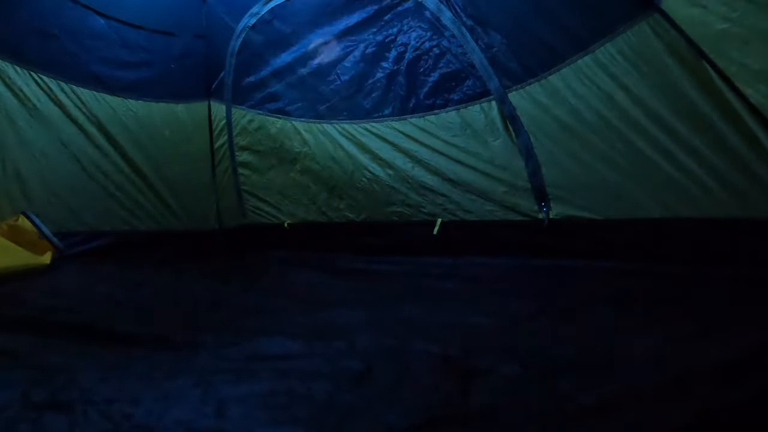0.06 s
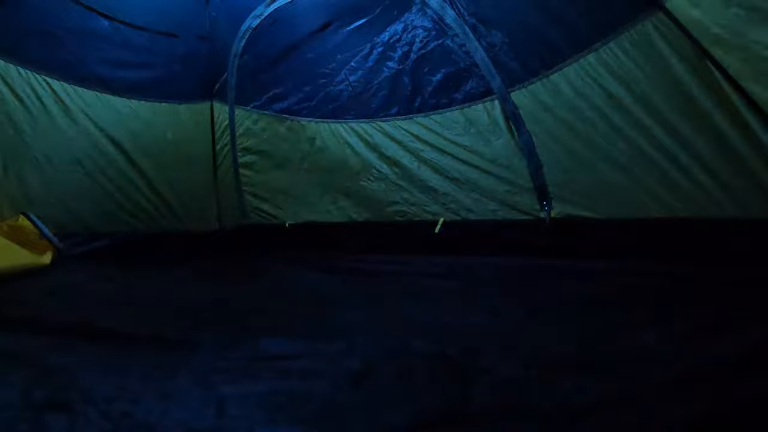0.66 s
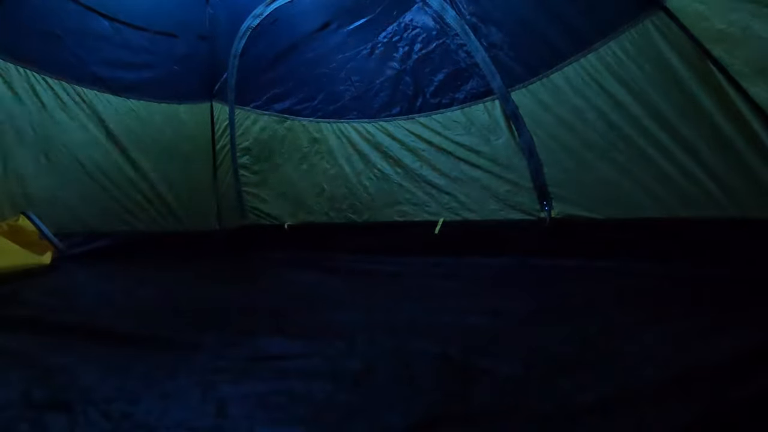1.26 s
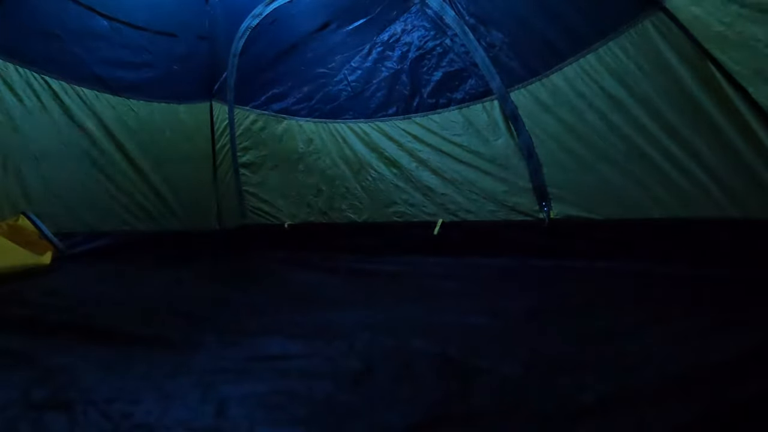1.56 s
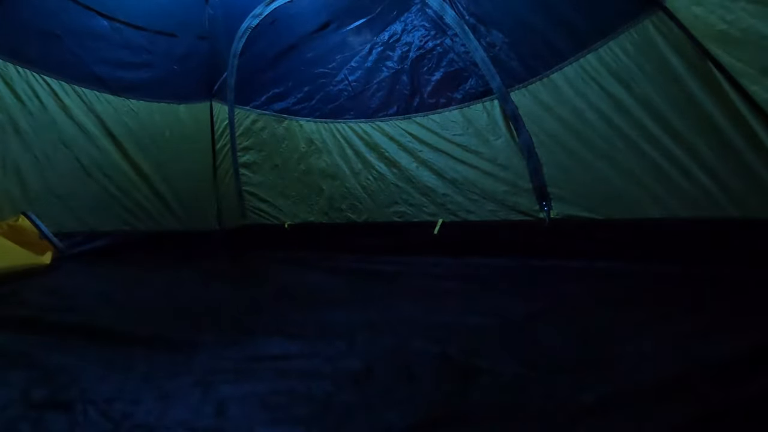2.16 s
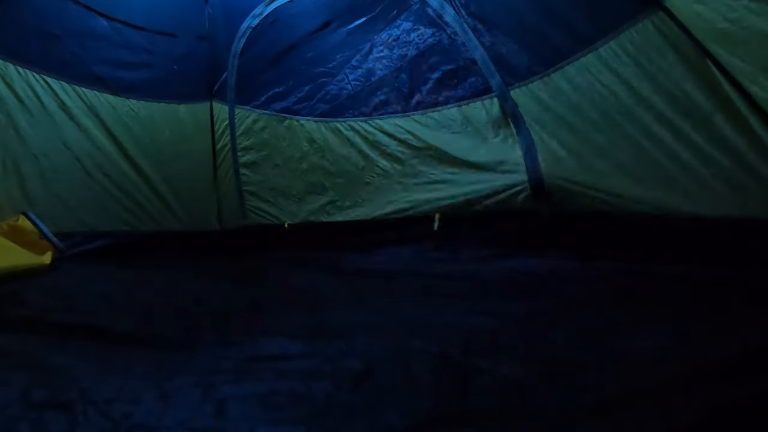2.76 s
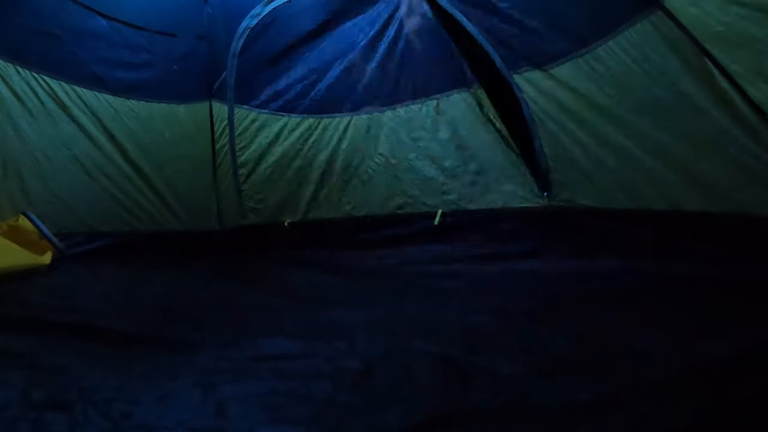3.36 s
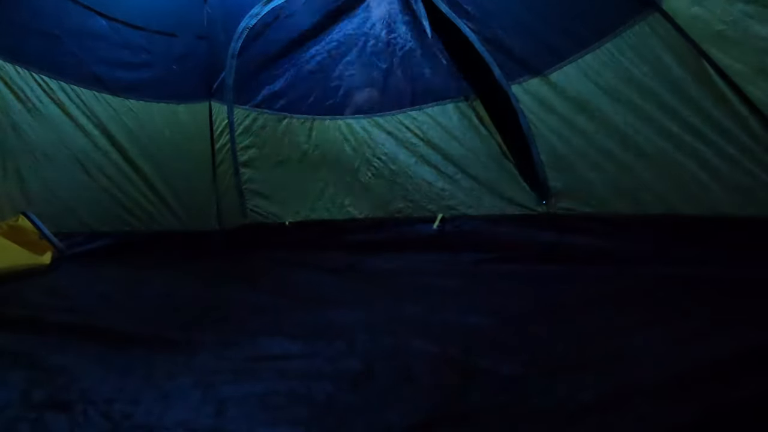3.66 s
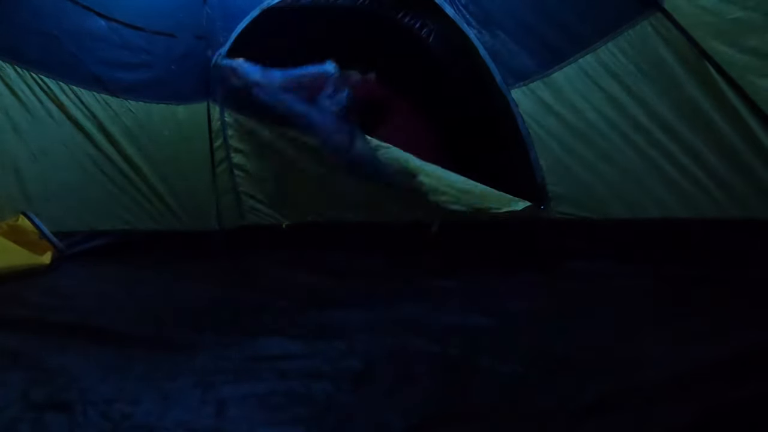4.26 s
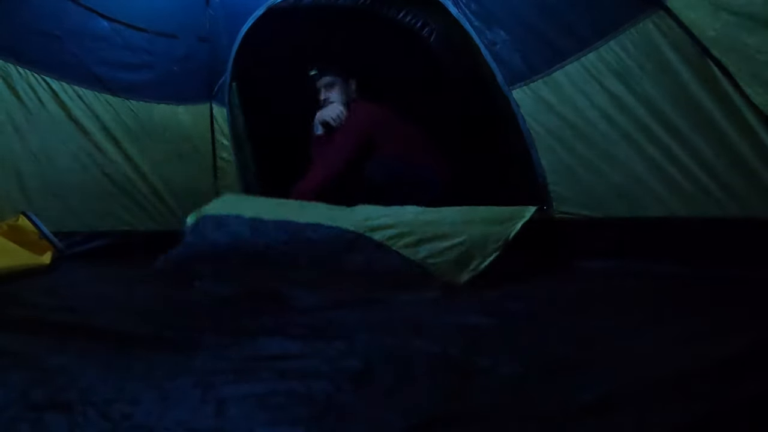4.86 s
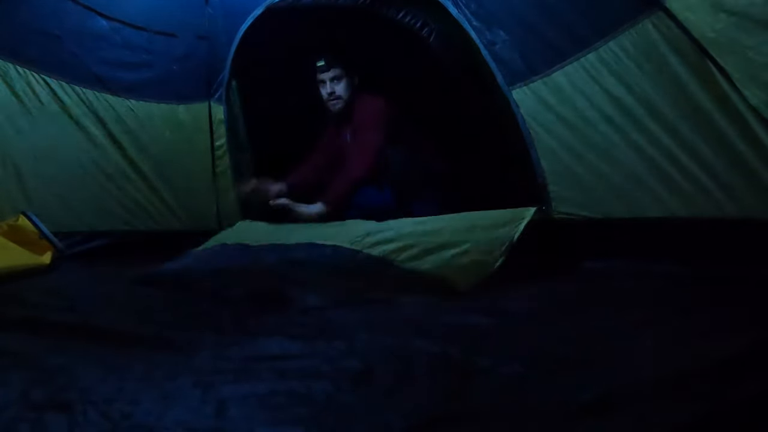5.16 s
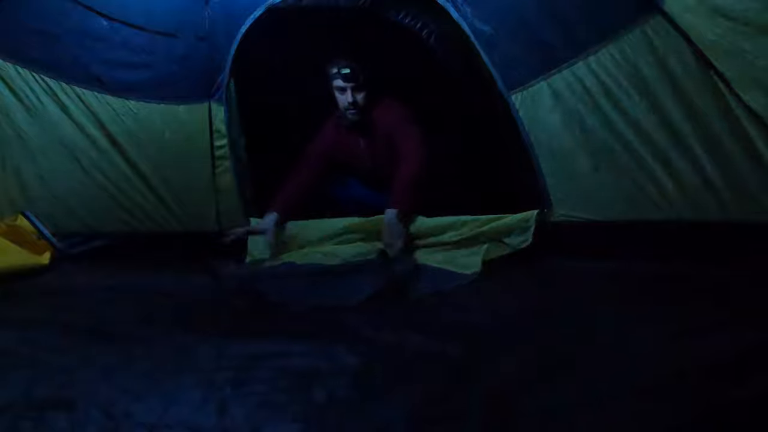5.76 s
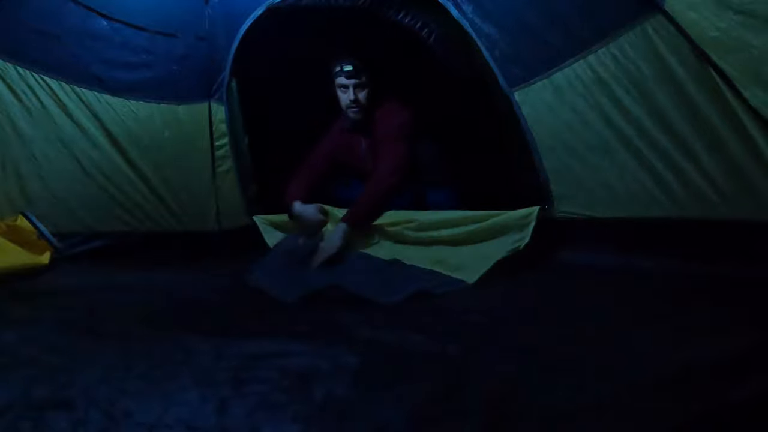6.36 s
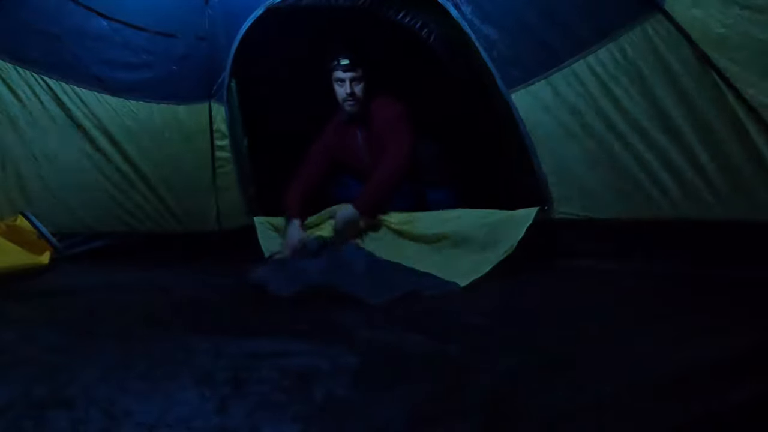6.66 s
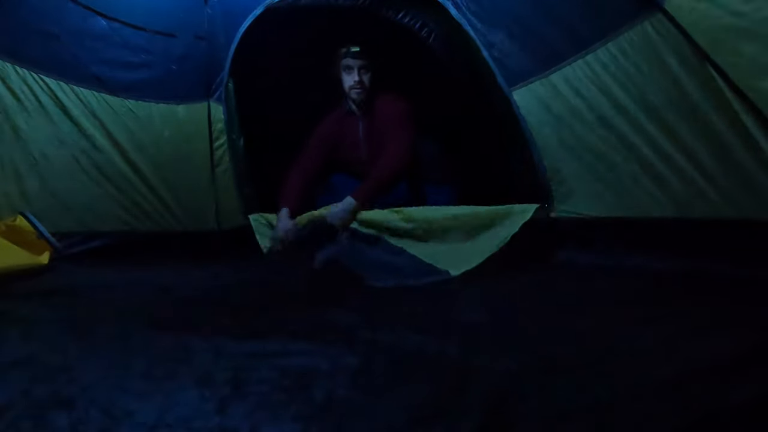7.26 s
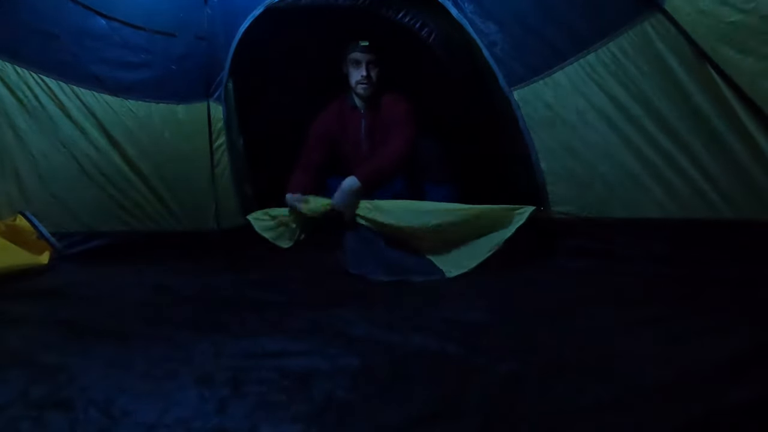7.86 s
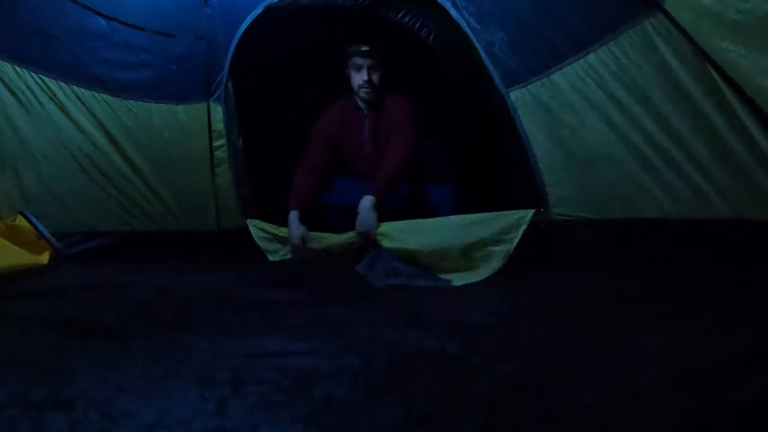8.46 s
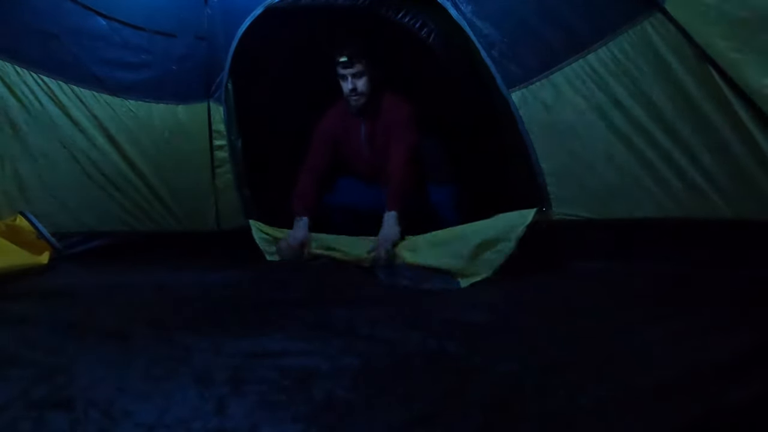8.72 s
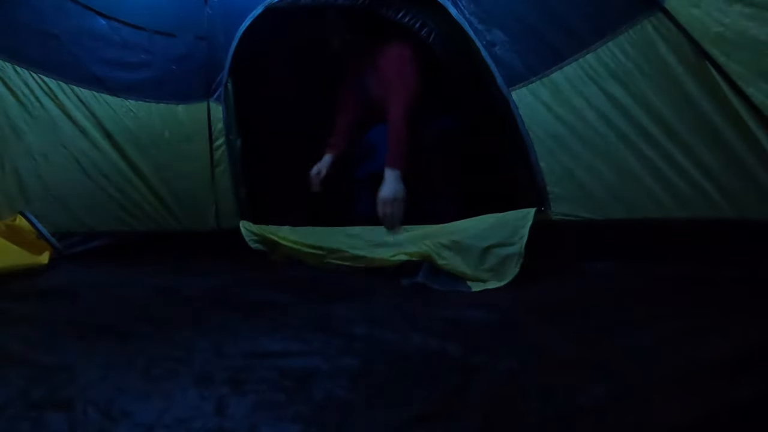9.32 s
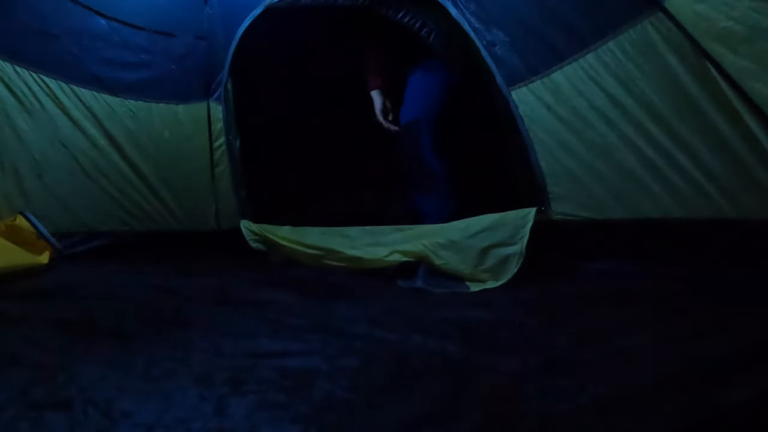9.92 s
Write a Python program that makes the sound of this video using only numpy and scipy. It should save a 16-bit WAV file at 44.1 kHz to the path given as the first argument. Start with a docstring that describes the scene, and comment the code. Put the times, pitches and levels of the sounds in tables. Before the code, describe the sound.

For the first 2.8 seconds, hands fumble at a nylon tent door: uneven swishes, sharp little crease snaps and muffled thuds, strongest around 1 second and then quieter. At about 2.8 seconds the zip starts, rasping and whining upward in pitch as its teeth click through the slider. It slows to a quiet creep around 3.6 seconds, then runs again from 3.9 to 4.9 seconds, higher and hissier as the fabric slackens, with small squeals and a sharp catch near 4.1. A few crisp snaps follow between 5 and 5.5 seconds. From there the loose door is rolled up by hand in repeated swishing, crumpling strokes, with soft flaps and thuds near 5.7, 6.8 and 8.6 seconds. The rustling fades out by about 9.7 seconds. A faint low rumble of moving air lies underneath throughout, and there is very little echo.

```python
"""A tent zip whines round the door in two long, uneven strokes with a slow creep between them, its
teeth clicking through the slider. Before that, someone inside fumbles at the nylon and tugs it taut;
afterwards the door drops slack and is rolled up by hand. The cloth swishes as it rubs over itself,
creases snap, and the loose panel flaps and thuds. A low rumble of moving air lies underneath."""
import sys
import numpy as np
from scipy import signal
from scipy.fft import rfft, irfft, next_fast_len
from scipy.io import wavfile
from scipy.ndimage import uniform_filter1d, map_coordinates

SR = 44100
rng = np.random.default_rng(int(sys.argv[2]) if len(sys.argv) > 2 else 0)


def master_out(mix):
    """Clip the mix to full scale and print it as 16-bit PCM to the path in sys.argv[1]."""
    frames = np.transpose(np.atleast_2d(mix))
    ceiling = np.clip(frames, -1, 1)
    pcm = np.round(ceiling * 32767).astype(np.int16)
    wavfile.write(sys.argv[1], SR, pcm)


N = 440559

NYLON_SPECTRUM = [(350, -9.5), (600, -7.5), (855, -15.5), (967, -8), (1220, -3.5), (1400, -0.5), (2130, -2),
                  (2510, -0.5), (3480, 0.5), (3990, -1), (7080, -3), (8570, -12), (11000, -14.5),
                  (12000, -12.5), (15600, -32.5)]  # tone colour of the cloth: f/Hz, level/dB
CLOTH_BALANCE = [(60, 0.5), (110, 0), (200, -0.5), (380, -0.5), (700, 0), (1290, 0), (2380, 0.5),
                 (4400, 1.0), (8120, 2.5), (15000, 10)]  # where the cloth is heard: f/Hz, left minus right/dB
PANEL_LIKENESS = [(60, 0.96), (300, 0.96), (900, 0.9)]  # how alike left and right are in the low sounds: f/Hz, likeness


def zipper(even_hz=585, easy_pull_db=-33, drag=0.33, judder=0.055):
    """A slow slider scrapes, a fast one clicks evenly; a taut door rings along, a slack one hisses."""
    taut_spectrum = [(200, -36), (400, -11), (700, -11.5), (1000, -1.5), (1300, 1.5), (1700, 1), (2250, 0),
                     (2750, 1.5), (3400, -5.5), (4800, -1), (6000, -11), (8000, -27), (12000, -21),
                     (15700, -43)]  # the zip in tight cloth: f/Hz, level/dB
    slack_spectrum = [(1470, -36), (2500, -9), (2760, -14), (2850, -3.5), (3560, -3.5), (4340, -3),
                      (6270, 1.5), (6880, 0.5), (7770, -1.5), (8650, -8.5), (12300, -10), (13800, -15),
                      (15600, -38)]  # the zip in loose cloth: f/Hz, level/dB
    door_tension = [(2.8, 1), (3.16, .87), (3.23, 0.29), (3.5, 0.08), (4.62, 0.05), (4.85, 0.44)]  # the door loosens, then its own weight pulls: t/s, tension 0-1
    zip_likeness = [(60, 0.89), (150, 0.8), (380, 0.51), (950, 0.96), (2380, 0.7), (5980, 0.92),
                    (15000, 0.48)]  # how alike left and right are: f/Hz, likeness
    zip_balance = [(60, 0.5), (120, 0.0), (240, -0.5), (480, -3), (950, -2), (1890, -0.5), (3770, 0),
                   (7520, 1), (15000, 9)]  # where the zip is heard: f/Hz, left minus right/dB
    arch_path = [(2.8, -1), (2.98, 0), (3.92, 1.5), (4.04, 3), (4.5, 2.5), (4.94, 1.5)]  # the slider crosses the arch: t/s, lean to the left/dB
    placed = lambda x: filtered(x, lambda hz: pan(along(zip_balance, hz)))
    speed, strength = slider()
    # a harder pull drags, and needs more speed to click evenly
    needed_hz = even_hz * (np.abs(strength) / amp(easy_pull_db)) ** drag
    scraping = needed_hz ** 2 / (needed_hz ** 2 + speed ** 2)  # 0 = all clicks, 1 = all scrape
    jumps = judder * scraping * np.tanh(3 * wobble(55))  # a dragging slider jerks slower and faster
    rate = speed * np.exp(jumps + 0.0157 * wobble(260))
    clicks, teeth_passed = tooth_clicks(rate, scatter=0.032, size_db=-0.5)
    tooth_swell = 1 + 0.091 * np.cos(2 * np.pi * teeth_passed)
    scrape = unit(crackle(rate=2500, spread_db=-0.5, hiss=1.0) * tooth_swell)
    drive = np.sqrt(1 - scraping) * placed(short_echo(clicks, wet_db=0))
    drive += np.sqrt(scraping) * stereo(scrape, zip_likeness, zip_balance)
    drive = shifting_folds(drive, depth_db=3.5)
    tension = np.clip(curves(door_tension)[0], 0, 1)
    taut = np.sqrt(tension) * coloured(drive, taut_spectrum)
    slack = np.sqrt(1 - tension) * coloured(drive, slack_spectrum)
    rasp = levelled(taut + slack) * strength * amp(-0.27 + 1.22 * wobble(90))
    singing = placed(whine(teeth_passed, speed, strength * (1 - scraping)))
    return (rasp + singing) * pan(curves(arch_path)[0] - 0.5)


def slider():
    """Two uneven strokes with a slow creep between; gives the teeth per second and the strength."""
    stretches = [
        [(2.8, 190.6, -49), (2.895, 372.4, -35), (2.945, 440, -36), (2.98, 572, -32), (3.01, 539, -34),
         (3.032, 689, -31), (3.06, 605, -32.5), (3.09, 673, -30.5), (3.17, 731, -31)],
        [(3.215, 699, -39.5), (3.255, 949, -38), (3.295, 776, -35.5), (3.345, 860, -35.5), (3.42, 700, -38),
         (3.47, 639, -36.5), (3.59, 252, -47), (3.73, 323.5, -41), (3.8, 241.5, -50)],
        [(3.87, 302, -43.5), (3.95, 764, -40), (4.0, 998, -37.5), (4.108, 1101, -33.5), (4.12, 1051, -33),
         (4.137, 944, -32), (4.2, 953, -36.5), (4.28, 834, -36.5), (4.41, 886, -33)],
        [(4.49, 725, -32), (4.58, 941, -32.5), (4.62, 918, -31), (4.65, 997, -30), (4.74, 1013, -35),
         (4.785, 790, -32), (4.86, 780, -37), (4.91, 697, -35), (4.94, 685, -61.5)],
    ]  # the slider's travel, in parts joined up: t/s, tooth rate/Hz, level/dB
    path = [row for stretch in stretches for row in stretch]
    rate, db = curves(path)
    return rate, amp(db) * during(path)


def tooth_clicks(rate, scatter, size_db):
    """One click each time the slider parts a tooth, slightly off in time and size."""
    teeth_passed = np.cumsum(rate) / SR
    teeth = np.arange(1, int(teeth_passed[-1]))
    chance = rng.standard_normal((len(teeth), 2))
    position = np.interp(teeth + scatter * chance[:, 0], teeth_passed, np.arange(N))
    samples = position.astype(int)[:, None] + np.arange(-7, 9)
    offset = samples - position[:, None]  # a click can fall between two samples
    clicks = np.sinc(offset) * np.sinc(offset / 8) * amp(size_db * chance[:, 1:])
    train = np.bincount(np.clip(samples, 0, N - 1).ravel(), clicks.ravel(), N)
    return unit(filtered(train / np.sqrt(rate), lambda hz: hz > 100)), teeth_passed


def whine(teeth_passed, speed, strength, harmonics=5, wander_db=6):
    """The tooth rate and its multiples (harmonics) sing as they glide past the cloth's own notes."""
    cloth_response = [(330, -4), (550, -10.5), (720, -19), (850, -17), (1000, -14), (1350, -5),
                      (1650, -12.5), (1950, -11), (2600, -13.5), (3400, -5), (4500, -5.5), (6000, -17)]  # how strongly the cloth sings along: f/Hz, level/dB
    squeals = [(2.893, .035, 3, -33.5), (2.985, .032, 2, -28.5), (2.99, .055, 1, -37), (3.04, .026, 4, -26),
               (3.075, .06, 2, -33.5), (3.094, .03, 4, -28.5), (3.175, .03, 1, -39), (3.33, .065, 1, -40),
               (4.075, .04, 1, -42), (4.075, .05, 4, -38), (4.123, .012, 4, -26), (4.165, .035, 2, -37),
               (4.171, .09, 3, -37), (4.168, .08, 5, -38), (4.38, .02, 1, -42), (4.617, .028, 5, -34),
               (4.72, .05, 1, -37), (4.725, .055, 2, -33.5), (4.81, .04, 4, -37), (4.86, .022, 2, -37)]  # the stretched cloth squeals: t/s, length/s, harmonic, level/dB
    stutter = unit(amp(4.3 * np.tanh(2 * wobble(48))))  # the slider grips and lets go
    tone = np.zeros(N)
    for k in range(1, harmonics + 1):
        wander = unit(amp(wander_db * np.tanh(wobble(16))))  # each harmonic comes and goes
        sung = strength * stutter * amp(along(cloth_response, k * speed)) * wander
        squeal = sum(amp(db) * bump(s, length) for s, length, harmonic, db in squeals if harmonic == k)
        shiver = 0.45 * wobble(300) + 0.72 * wobble(45)
        flicker = unit(amp(3.9 * wobble(110)))
        tone += (sung + squeal) * flicker * np.sin(2 * np.pi * k * teeth_passed + shiver)
    return short_echo(tone, wet_db=-7)


def pull_tab(start_s=2.546, hz=3575):
    """The metal tab is flicked: it jitters and rings faintly on one note."""
    t = np.maximum(np.arange(N) / SR - start_s, 0)
    return amp(-55 - 58 * t) * fuzzy_tone(hz, width=170) * (t > 0)


def cloth():
    """Nylon slides over itself in tiny slips and swishes; crumpling adds a darker rustle."""
    cloth_likeness = [(60, 0.86), (120, 1.17), (240, 1.16), (480, 0.84), (950, 0.74), (1890, 0.79),
                      (3770, 0.61), (7520, 0.7), (15000, 0.23)]  # how alike left and right are: f/Hz, likeness (capped at 1)
    slackening = [(0, 3, -10), (2.8, 5, -11.5), (5.35, -1.5, -9), (5.6, 0, -5.5), (9.4, -5.5, -7.5)]  # a slack door rings less, hisses more: t/s, ring/dB, sheen/dB
    slips = crackle(rate=1500, spread_db=1.5, hiss=2.3)
    slips *= amp(0.94 * wobble(45) + 0.47 * wobble(240))  # the slips come in clumps
    slips = stereo(slips, cloth_likeness, CLOTH_BALANCE)
    swish = coloured(shifting_folds(slips, depth_db=1.64), NYLON_SPECTRUM)
    low = filtered(swish, lambda hz: 1 / (1 + (hz / 2500) ** 6))
    high = filtered(swish, lambda hz: 1 - 1 / (1 + (hz / 8000) ** 10))
    ring_db, sheen_db = curves(slackening)
    body = amp(1.17) * (swish - low - high)
    sheen = amp(sheen_db) * high / np.std(high.mean(axis=0))
    crumple = coloured(low, [(600, -1.2), (820, 0.013), (1450, -1.1)])
    ring = filtered(crumple, lambda hz: np.interp(hz, [820, 1000, 1150, 1450], [0, 1, 1, 0]))
    crumple += (amp(ring_db) - 1) * ring
    sliding = hand_strokes(offset_db=0, per_shake=0)
    crumpling = hand_strokes(offset_db=-4.5, per_shake=0.32)
    return sliding * (body + sheen) + crumpling * crumple


def hand_strokes(offset_db, per_shake):
    """Strength of the hands dragging the cloth; per_shake sets how much shaking the panel counts."""
    strokes = [(0.085, 0.135, 0.039, -53.5, -11.0), (0.234, 0.091, 0.053, -45.5, -11.0),
               (0.308, 0.018, 0.173, -39.5, -9.0), (0.544, 0.152, 0.146, -33.5, -14.0),
               (0.785, 0.188, 0.12, -41.5, -13.5), (0.902, 0.027, 0.102, -35.5, -0.5),
               (0.967, 0.013, 0.03, -36.0, 7.5), (1.182, 0.155, 0.016, -43.5, -7.0),
               (1.226, 0.063, 0.157, -41.0, -1.5), (1.595, 0.173, 0.158, -47.5, -7.5),
               (1.87, 0.12, 0.227, -58.5, -10.5), (2.156, 0.106, 0.062, -47.5, -4.0),
               (2.341, 0.192, 0.083, -59.5, -7.0), (2.441, 0.031, 0.198, -49.0, -6.0),
               (2.68, 0.191, 0.336, -58.0, -5.0), (5.005, 0.063, 0.062, -43.0, -4.5),
               (5.163, 0.057, 0.331, -54.5, -8.0), (5.354, 0.006, 0.16, -38.5, -17.5),
               (5.47, 0.067, 0.089, -33.5, -10.5), (5.615, 0.059, 0.311, -36.0, -12.5),
               (5.834, 0.01, 0.075, -40.0, -20.5), (6.072, 0.136, 0.077, -33.5, -15.0),
               (6.157, 0.035, 0.079, -38.0, -13.5), (6.363, 0.121, 0.087, -37.5, -19.0),
               (6.54, 0.069, 0.068, -29.5, -10.0), (6.676, 0.057, 0.083, -34.0, -9.0),
               (6.787, 0.022, 0.255, -35.5, -14.0), (7.036, 0.065, 0.122, -34.5, -13.5),
               (7.201, 0.048, 0.119, -34.5, -7.5), (7.375, 0.181, 0.35, -41.0, -12.0),
               (7.764, 0.106, 0.034, -35.5, -12.5), (7.863, 0.053, 0.056, -33.5, -11.5),
               (8.116, 0.318, 0.056, -36.5, -13.0), (8.247, 0.074, 0.037, -35.5, -14.0),
               (8.348, 0.056, 0.097, -36.0, -9.5), (8.505, 0.044, 0.214, -36.5, -10.5),
               (8.768, 0.223, 0.068, -39.0, -12.5), (9.048, 0.177, 0.142, -35.0, -17.0),
               (9.306, 0.205, 0.051, -42.0, -17.0), (9.424, 0.063, 0.113, -44.5, -11.5),
               (9.593, 0.04, 0.104, -54.5, -10.5)]  # hand movements: t/s, rise/s, fall/s, swish/dB, shake/dB
    power = sum((amp(db + offset_db + per_shake * shake_db) * swell(s, rise, fall)) ** 2
                for s, rise, fall, db, shake_db in strokes)
    return np.sqrt(power)


def whistles():
    """Ribs of the weave cross each other; the pitch rises and falls with the speed of the stroke."""
    fast_folds = [(6.498, 0.036, 2900, -37), (6.545, 0.044, 2960, -38), (6.557, .025, 3900, -35),
                  (7.04, 0.048, 7700, -36)]  # a fold slides fast: t/s, length/s, top pitch/Hz, level/dB
    out = np.zeros(N)
    for s, length, hz, db in fast_folds:
        stroke = bump(s, length)
        out += amp(db) * stroke * fuzzy_tone(hz * (0.7 + 0.3 * stroke), width=370)
    return short_echo(out, wet_db=-1)


def panel():
    """Shaken by the hands and the slider, the door flutters in small flaps and billows in slow ones."""
    # single low flaps of the panel, some as the zip tugs the door: t/s, length/s, flutter/dB, billow/dB
    single_flaps = [(0.394, 0.026, -51, -42), (0.605, .036, -52, -45), (2.826, 0.049, -50, -43.5),
                    (2.89, 0.062, -39, -60), (3.1, 0.13, -51.5, -61), (3.746, 0.18, -51.5, -57),
                    (4.547, 0.098, -59, -49), (5.727, 0.049, -47, -38), (6.844, 0.062, -43.5, -41),
                    (7.585, 0.086, -53, -68), (8.647, 0.023, -41, -40.5)]
    flutter_spectrum = [(88, -57), (150, 0), (195, 1), (248, 0.5), (279, -1), (317, -1), (462, -9),
                        (741, -26.5), (900, -49), (1170, -53), (1980, -120)]  # small flaps: f/Hz, level/dB
    billow_spectrum = [(29, -48), (50, 4.5), (113, -2.5), (151, -6.5), (200, -9.5), (260, -18), (440, -120)]  # slow flaps: f/Hz, level/dB
    _, pull = slider()
    # powers add up: hands, slider, and a little more as the panel never hangs quite still
    flutter = hand_strokes(offset_db=-2, per_shake=0.84) ** 2 + (amp(-31.5) * pull) ** 2 + amp(-73.5) ** 2
    billow = hand_strokes(offset_db=-1.5, per_shake=1.27) ** 2 + (amp(-25.5) * pull) ** 2 + amp(-62) ** 2
    for s, length, flutter_db, billow_db in single_flaps:
        flap = swell(s, length, length)
        flutter += (amp(flutter_db) * flap) ** 2
        billow += (amp(billow_db) * flap) ** 2
    quick = stereo(crackle(rate=260, spread_db=1.5, hiss=0.79), PANEL_LIKENESS, CLOTH_BALANCE)
    slow = stereo(crackle(rate=90, spread_db=-1.5, hiss=1.0), PANEL_LIKENESS, CLOTH_BALANCE)
    flutters = coloured(quick, flutter_spectrum) * np.sqrt(flutter)
    billows = coloured(slow, billow_spectrum) * np.sqrt(billow)
    return (flutters + billows) * amp(2.16 * wobble(24))


def snaps():
    """A crease flips over or the slider catches: a bright tick with a duller crack under it."""
    snap_events = [(0.194, -28.5, -25), (0.543, -23, -12), (0.5787, -24, -6), (0.8923, -15, -24),
                   (0.966, -27, -2), (1.1704, -27, -12), (1.509, -29, -8), (2.4268, -33, -11),
                   (2.4837, -21, -22), (2.546, -33, -21), (2.7415, -32, -16), (2.803, -33, -13),
                   (4.117, -15, -24), (5.001, -21, -18), (5.2259, -39, -16), (5.353, -26.5, -18),
                   (5.421, -21, -18), (5.4884, -21, -14)]  # each snap: t/s, level/dB, extra level for the crack/dB
    crack_spectrum = [(100, -20), (300, -13), (750, -1), (1300, 3), (2500, 3), (5000, -37)]
    t = np.arange(SR // 8) / SR
    tick_fade = amp(-60 * t / 0.018) + amp(-13 - 60 * t / 0.1)  # sharp start, softer tail
    bright, dull = np.zeros((2, N + SR))
    for s, db, crack_db in snap_events:
        burst = rng.standard_normal((2, len(t)))
        bright[round(s * SR):][:len(t)] += amp(db - 4) * tick_fade * burst[0]
        dull[round(s * SR):][:len(t)] += amp(db + crack_db + 7.5 - 60 * t / 0.024) * burst[1]
    tick = filtered(bright[:N], lambda hz: amp(along(NYLON_SPECTRUM, hz)))
    crack = filtered(dull[:N], lambda hz: amp(along(crack_spectrum, hz)))
    return short_echo(tick + crack, wet_db=-6.5)


def thuds():
    """A tug or bump sounds the panel like a muffled drum, mostly in the notes near one centre pitch."""
    tugs = [(0.363, -31.5, 124), (0.944, -22.5, 116), (0.963, -18, 324), (1.227, -26.5, 69.5),
            (1.508, -34, 78.1), (2.815, -32, 70.0), (5.704, -37, 67.3), (5.752, -32, 64.6),
            (6.829, -33, 86.1), (8.63, -35, 156)]  # each tug or bump: t/s, peak level/dB, centre pitch/Hz
    drum_notes = [(71, -13.5, 0.18), (110, 5, 0.033), (169, 1.5, 0.088), (237, -7, 0.06), (322, 3, 0.058),
                  (440, -4, 0.035)]  # the panel's own notes: f/Hz, level/dB, time to fade by 60 dB/s
    t = np.arange(SR // 4) / SR
    out = np.zeros(N + SR)
    for s, db, centre in tugs:
        ring = np.zeros(len(t))
        for k, (hz, level, fade_s) in enumerate(drum_notes):
            strength_db = level + rng.normal(0, 3.7) - 10 * np.log2(hz / centre) ** 2
            pitch = hz * np.exp(rng.normal(0, 0.077))
            ring += (-1) ** k * amp(strength_db - 60 * t / fade_s) * np.sin(2 * np.pi * pitch * t)
        ring *= 1 - np.exp(-t / 0.0038)  # soft start
        out[round(s * SR):][:len(t)] += amp(db) * ring / np.abs(ring).max()
    return short_echo(out[:N], wet_db=-33)


def background():
    """Low rumble of moving air and a faint even hiss."""
    rumble_spectrum = [(5, 1.5), (12, 6), (22, -2), (35, 5), (55, -20.5), (80, -32), (160, -53)]  # tone colour of the air: f/Hz, level/dB
    rumble_level = [(0.0, -52.5), (0.75, -46), (2.75, -58.5), (2.78, -45.5), (2.89, -54), (3.73, -58),
                    (3.81, -45), (4.42, -61), (4.48, -49.5), (6.4, -60.5), (6.45, -49.5), (7.57, -54),
                    (8.71, -55), (9.68, -65), (9.74, -49), (9.99, -62)]  # its rise and fall: t/s, level/dB
    hiss_spectrum = [(100, 1.5), (300, -2.5), (700, -14), (1400, -6.5), (6000, -12.5), (15000, -25)]
    air = stereo(rng.standard_normal((2, N)), PANEL_LIKENESS, CLOTH_BALANCE)
    rumble = coloured(air, rumble_spectrum) * amp(curves(rumble_level)[0] + 4)
    return rumble + amp(-66) * coloured(rng.standard_normal((2, N)), hiss_spectrum)


def crackle(rate, spread_db, hiss):
    """Two streams of tiny slips of unequal size, on a bed of smooth rubbing noise."""
    slips = (rng.random((2, N)) < rate / SR) * rng.standard_normal((2, N))
    slips *= amp(spread_db * np.clip(rng.standard_normal(N), -2, 2))
    return unit(unit(slips) + hiss * rng.standard_normal((2, N)))


def shifting_folds(x, depth_db):
    """As the cloth changes shape, different pitches stand out; the highest treble stays even."""
    hz, _, spectra = signal.stft(x, SR, nperseg=512)
    patches = uniform_filter1d(rng.standard_normal(spectra.shape[1:]), size=5, axis=0)
    patches = uniform_filter1d(patches, size=7, axis=1)
    reach = 1 / (1 + (hz[:, None] / 7500) ** 6)
    return signal.istft(spectra * amp(depth_db * reach * unit(patches)), nperseg=512)[1][:, :N]


def short_echo(x, wet_db):
    """A mono sound plus a short blurred echo, different on each side."""
    echo_fade = [(200, 0.12), (2000, 0.12), (12000, 0.12)]  # how long the echo lasts: f/Hz, time to fade by 60 dB/s
    hz, t, spectra = signal.stft(rng.standard_normal((2, SR // 3)), SR, nperseg=256)
    tail = signal.istft(spectra * amp(-60 * t / along(echo_fade, hz)[:, None]), SR, nperseg=256)[1]
    echo = signal.fftconvolve(x[None], tail / np.linalg.norm(tail[0]), axes=1)[:, :N]
    return (x + amp(wet_db) * echo) / np.hypot(1, amp(wet_db))


def stereo(pair, likeness, balance):
    """Two unrelated signals become left and right with a given likeness and balance."""
    angle = lambda hz: np.arccos(np.clip(along(likeness, hz), 0, 1)) / 2
    mid, side = filtered(pair, lambda hz: np.array([np.cos(angle(hz)), np.sin(angle(hz))]))
    lean = lambda hz: pan(along(balance, hz))
    return filtered(np.array([mid + side, mid - side]), lambda hz: lean(hz) / lean(hz).mean(axis=0))


def pan(db):
    """Left and right gains that make the left louder by db."""
    return amp(np.outer([0.5, -0.5], db))


def fuzzy_tone(hz, width):
    """A narrow band of noise round a steady or moving pitch."""
    phase = 2 * np.pi * np.cumsum(hz * np.ones(N)) / SR
    return wobble(width) * np.cos(phase) + wobble(width) * np.sin(phase)


def wobble(rate):
    """A smooth curve through rate random points a second."""
    return map_coordinates(rng.standard_normal(int(N * rate / SR) + 4), [np.arange(N) * rate / SR])


def swell(s, rise, fall, roundness=1.35):
    """A gain that peaks at time s and is 10 dB lower one rise earlier and one fall later."""
    t = np.arange(N) / SR - s
    near = (t > -4 * rise) & (t < 4 * fall)
    distance = np.abs(t[near] / np.where(t[near] < 0, rise, fall))
    gain = np.zeros(N)
    gain[near] = amp(-10 * distance ** roundness)
    return gain


def bump(s, length):
    """A bell-shaped gain that peaks at time s."""
    return np.exp(-2 * ((np.arange(N) / SR - s) / length) ** 2)


def during(rows):
    """1 while a table lasts, with short soft edges."""
    t = np.arange(N) / SR
    return uniform_filter1d(((t >= rows[0][0]) & (t <= rows[-1][0])) * 1., size=400)


def curves(rows):
    """One value per sample for each column after the time."""
    s, *columns = np.transpose(rows)
    return [np.interp(np.arange(N) / SR, s, column) for column in columns]


def along(points, hz):
    """Read between (f/Hz, value) points on a logarithmic frequency scale."""
    f, values = np.transpose(points)
    return np.interp(np.log(hz + 1), np.log(f + 1), values)


def filtered(x, response):
    """Turn each frequency of x up or down by response(hz)."""
    size = next_fast_len(N + SR // 2)
    return irfft(rfft(x, size) * response(np.fft.rfftfreq(size, 1 / SR)), size)[..., :N]


def coloured(x, spectrum):
    """Give x a tone colour (f/Hz, level/dB); the average of left and right gets strength 1."""
    y = filtered(x, lambda hz: amp(along(spectrum, hz)))
    return y / np.std(y.mean(axis=0))


def levelled(x):
    """Even out the strength of x over time."""
    return x / np.sqrt(np.abs(uniform_filter1d(x.mean(axis=0) ** 2, size=2500)) + 1e-6)


def unit(x):
    """Scale to an average strength (rms) of 1."""
    return x / np.sqrt(np.mean(x ** 2) + 1e-20)


def amp(db):
    """Decibels to gain."""
    return 10 ** (np.asarray(db) / 20)


def scene():
    """Everything that sounds at the tent door."""
    return zipper() + pull_tab() + cloth() + whistles() + panel() + snaps() + thuds() + background()


def record(dry, top_hz=15770):
    """Cut off the very highest treble."""
    return filtered(dry, lambda hz: hz < top_hz)


dry = scene()
out = record(dry)
master_out(out)
```